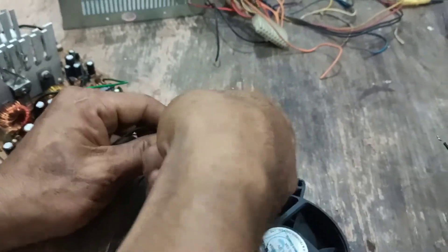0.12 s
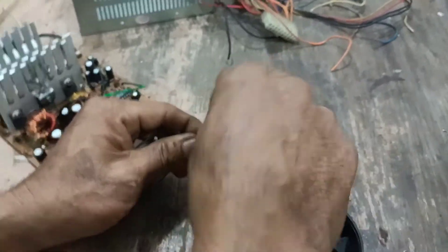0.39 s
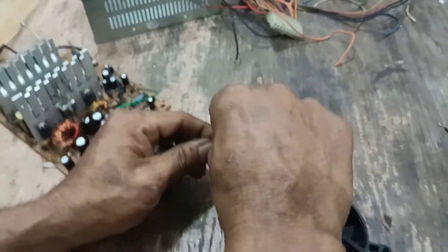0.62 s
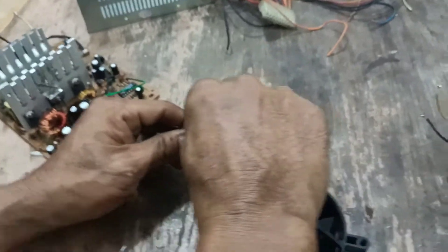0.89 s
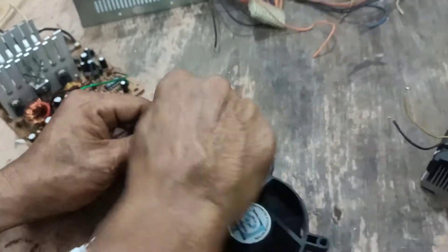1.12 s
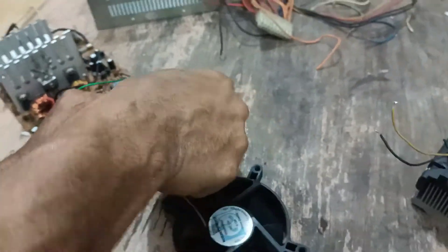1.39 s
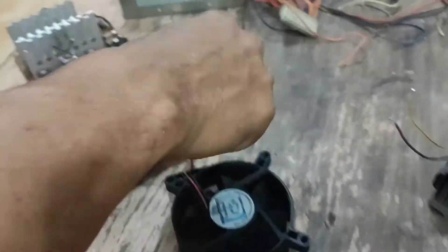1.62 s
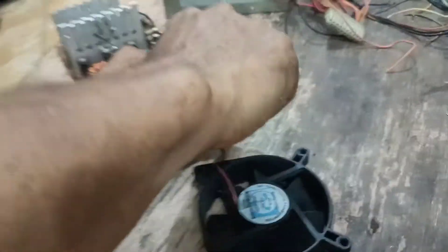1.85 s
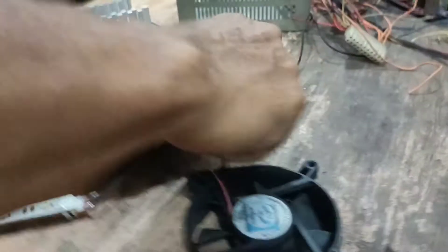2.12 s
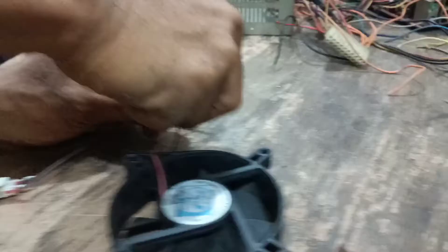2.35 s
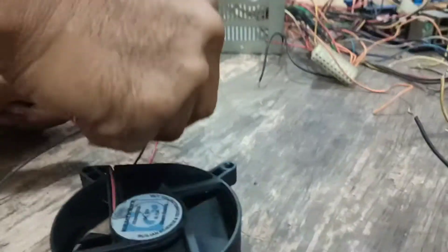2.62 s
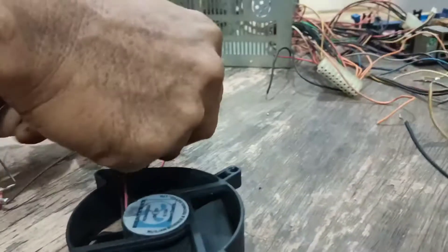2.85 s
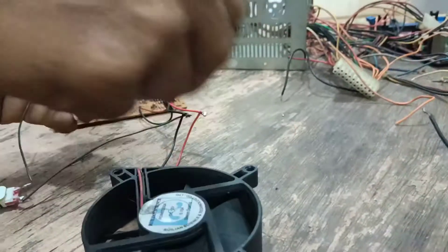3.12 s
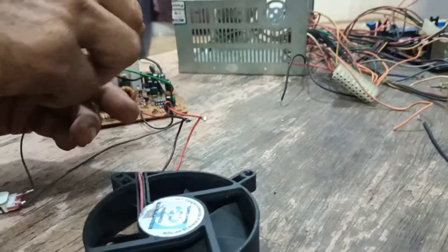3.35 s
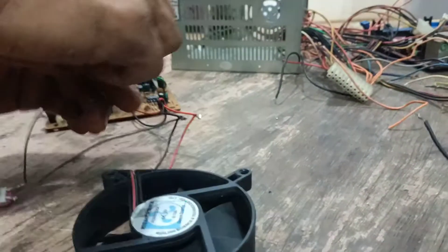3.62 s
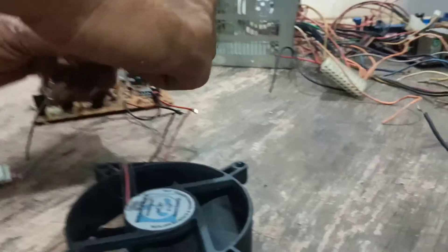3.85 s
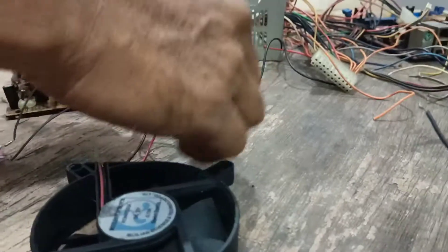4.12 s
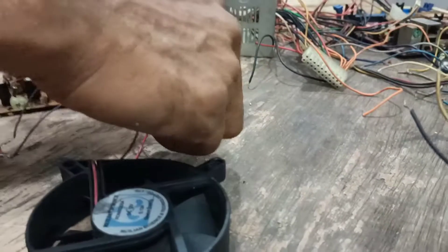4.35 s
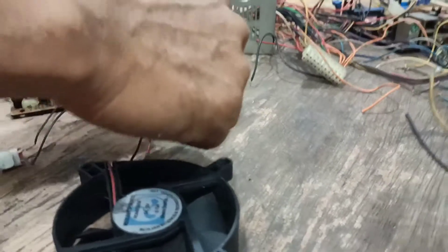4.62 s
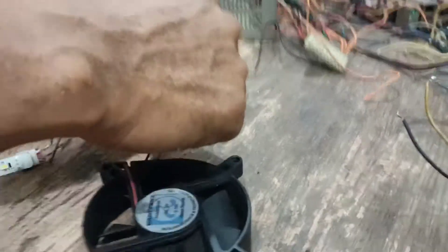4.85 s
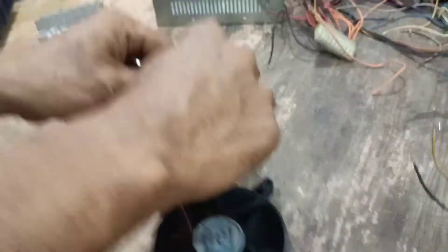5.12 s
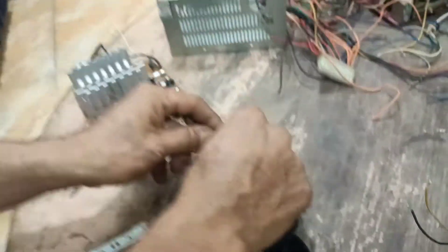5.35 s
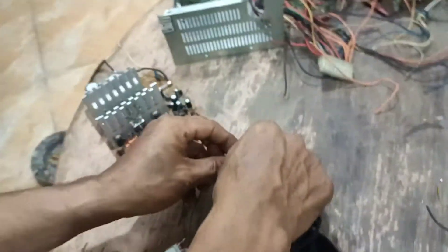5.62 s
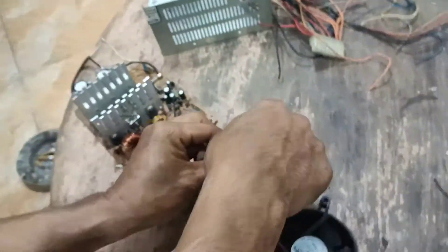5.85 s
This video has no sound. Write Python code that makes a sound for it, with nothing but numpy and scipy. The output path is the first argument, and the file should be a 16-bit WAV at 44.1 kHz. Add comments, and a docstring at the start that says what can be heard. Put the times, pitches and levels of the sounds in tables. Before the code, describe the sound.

A faint, steady hum of a small motor, low tones around 300 Hz with a thin whine near 2.4 kHz on the right, wavers throughout over quiet room air, its balance shifting as the phone moves. From 0 to 1.4 s there are only soft skin and wire rustles, a tiny ping at 0.35 and three light ticks near 1.1. Small dry clicks and brief rustles gather at 2.3-2.7. At 2.9 a loud double knock hits the right side with a low bump. The whine is stronger from 3 to 4.7 s. Left-side clicks come at 4.0, and a sharp snap cluster on both sides at 4.6. At 5.0 a very loud thump leads into a rough finger drag on the right that fades into patches until 5.4, amid heavy knocks at 5.23-5.28. Another knock lands at 5.48, then lighter taps continue to the end. Close, dry, hand-held phone sound.

```python
"""Wires being twisted together rustle, tick and ping over the steady hum of a small motor nearby.
Place: a workbench, heard close up from a hand-held phone with two microphone ports.
The motor is a set of wavering tones, some following the phone's swing through standing waves; skin and
wire are grainy noise and damped pulses; the holding finger bumps (decaying swings) and rubs the right port.
Each port has its own treble resonance."""
import sys
import numpy as np
from scipy import signal
from scipy.fft import rfft, irfft
from scipy.io import wavfile
from scipy.ndimage import uniform_filter1d

SR = 44100
rng = np.random.default_rng(int(sys.argv[2]) if len(sys.argv) > 2 else 0)


def to_wav(s):
    """Save 16-bit WAV."""
    ch = np.atleast_2d(s).T  # columns
    pcm = np.round(np.clip(ch, -1, 1) * 32767)  # PCM
    wavfile.write(sys.argv[1], SR, pcm.astype(np.int16))


def invert_db(level):
    """Linear amplitude ratio for a level in decibels (20 dB per decade), elementwise."""
    return 10 ** (np.asarray(level, dtype=float) / 20)


N = 263718
T = np.arange(N) / SR

# All levels are at the ports, ahead of the port colour and the preamp.
# room air noise: (frequency [Hz], left level [dB per Hz], right level [dB per Hz])
AIR_SPECTRUM = [(25, -90, -103), (49.7, -83.5, -78.5), (100, -89, -94), (186, -81.5, -83), (278, -90, -90),
                (416, -87, -93), (620, -94, -93.5), (800, -102, -100), (1300, -102, -99), (2000, -107, -99),
                (2754, -112, -103), (2830, -116, -113)]
AIR_TREBLE_DB = -114  # per Hz, from 3600 Hz up
# power the ports' air noise has in common, kept within 0.01-0.99: (frequency [Hz], share [0-1])
AIR_LIKENESS = [(60, 0.46), (130, 0.83), (290, 0.78), (640, 0.51), (1410, 0), (3100, -0.08), (6820, 0),
                (15000, 0.53)]

SHAFT_HZ, COIL_HZ = 48.08, 300.7
# tones whose loudness follows the phone through the room's standing waves [Hz]
STANDING_HZ = (COIL_HZ, 9 * SHAFT_HZ, 11 * SHAFT_HZ, 13 * SHAFT_HZ, 5 * COIL_HZ, 1546.6)
# the same tones at both ends of the swing:
# (left at 0 [dB], right at 0 [dB], left at 1 [dB], right at 1 [dB])
STANDING_ENDS = [(-63, -67.5, -72, -71), (-82, -65, -58.5, -63.5), (-58.5, -64.5, -60, -95),
                 (-92, -96, -65, -72.5), (-80, -78, -83, -80), (-88, -78.5, -76, -71)]
# how far the phone has swung along the bench: (time [s], share [0-1])
PHONE_PLACE = [(0, 0.04), (.9, 0), (1.2, .15), (1.6, 0.44), (2.1, 0.39), (2.8, 0.94), (3.5, 0.86),
               (4.0, .9), (4.5, 0.98), (5.0, 0.8), (5.6, 0.5), (5.98, 0.46)]
# motor tones that ignore the phone's place: (frequency [Hz], left level [dB], right level [dB])
STEADY_TONES = [(96.5, -73, -73), (119, -70, -70), (144.5, -74, -72), (172.3, -71, -70), (902, -74, -72),
                (1202.3, -84, -83), (1804, -87, -81), (2115.6, -87, -74), (6634, -105, -96)]
TONE_WAVER_DB = 1.5
# whine at 49 shaft turns on the right port: (time [s], level [dB])
WHINE_LEVEL = [(0, -72.5), (.7, -70), (1.2, -67.5), (1.7, -62.5), (2.0, -74), (2.35, -65), (2.8, -67.5),
               (3.2, -58.5), (3.6, -63.5), (4.0, -59.5), (4.5, -60), (4.9, -66), (5.1, -85), (5.98, -72)]
WHINE_LEFT_DB = -20  # relative to the right port
# side tones on the whine: shaft multiples, and dB relative to the whine
SIDE_TURNS, SIDE_DB = (47, 48, 50, 51), (-26, -10.5, -7.5, -15.5)
SIDE_WAVER_DB = 3
# smeared whine near 94 shaft turns: (left, right) level, and flutter depth
SMEAR_DB, FLUTTER_DB = (-104, -84.5), 3.5

# skin and wire rustling on the bench:
# (start [s], length [s], body level [dB], hiss level [dB], left minus right [dB])
RUSTLES = [(0.086, 0.28, -74, -63, -3), (.45, .091, -71, -75, 2), (1.03, 0.16, -74, -64, -0.5),
           (1.074, .062, -72, -79, -1), (1.17, 0.17, -66.5, -64.5, 1), (1.432, 0.26, -75, -68.5, -.5),
           (2.461, 0.037, -62, -51.5, 16), (2.466, 0.028, -53.5, -80, -12), (2.534, .022, -56, -51.5, 20),
           (2.596, 0.037, -59, -65.5, 3), (2.642, 0.036, -65, -59.5, 1), (2.691, 0.0077, -57, -58.5, 15),
           (3.992, 0.033, -58, -68, 10), (4.378, .05, -63, -75, 4), (5.743, 0.021, -61, -56.5, 17)]
RUB_HZ, RUB_WIDTH_HZ, RUB_GRAIN_DB = 1600, 1140, 3.5  # width of each of two filter passes
RUB_EDGE = 0.29  # share of the length

# pings of wire ends: (time [s], frequency [Hz], length [s], left peak [dB], right peak [dB])
WIRE_PINGS = [(0.355, 2310, 0.0054, -59, -42.5), (1.902, 4800, 0.0043, -62, -58),
              (4.373, 2680, .012, -67, -64), (5.216, 1430, 0.0049, -65, -22)]

# ticks and snaps, peaks at the nearer port:
# (time [s], body frequency [Hz], body peak [dB], crack peak [dB], left minus right [dB])
SNAPS = [(1.081, 910, -42, -48, 1), (1.098, 1100, -41, -65, -12), (1.1153, 1070, -40, -42, -2.5),
         (2.3112, 1700, -59, -55, -16), (2.482, 1850, -38, -36, -4), (2.5661, 1470, -42, -70, -30),
         (2.6555, 1440, -57, -44, -3), (2.693, 1600, -40, -53, 15), (2.8956, 1230, -10, -13.5, -25),
         (2.9003, 1800, -22, -24, -16), (2.9054, 1600, -7, -16, -14), (3.0924, 2030, -56, -45.5, -20),
         (3.986, 1480, -22, -43, 40), (3.9996, 1140, -29, -57, 32), (4.0103, 1290, -24.5, -33, 40),
         (4.3795, 1200, -36, -60, -5), (4.4676, 1600, -38, -35, -3), (4.4965, 2000, -62, -48, -8),
         (4.5353, 1300, -35, -54, -35), (4.5742, 1510, -40, -57, -30), (4.5905, 1170, -14, -48, -17),
         (4.589, 1120, -18, -8.5, 30), (4.5917, 1410, -15, -17.5, 12), (4.6075, 1380, -16.5, -48, -14),
         (4.823, 1110, -37.5, -70, -35), (4.9929, 800, -29, -28, -30), (4.9961, 1000, -7, -19, -38),
         (5.001, 1030, -5.5, -18, -22), (5.219, 1430, -16, -25, -45), (5.2323, 1060, -8.5, -28.5, -47),
         (5.2728, 910, -17.5, -44, -37), (5.2806, 1140, -3.5, -29.5, -42), (5.3643, 1050, -25, -51, -40),
         (5.4844, 1060, -11.5, -29.5, -40), (5.5706, 920, -34, -49, -30), (5.6367, 1160, -40.5, -53, 15),
         (5.662, 960, -34, -70, -35), (5.7494, 810, -32, -48, 2.5), (5.8555, 1020, -34.5, -51, -10),
         (5.872, 1450, -32, -54, -30), (5.9264, 1600, -30.5, -59, -28)]
FAR_CRACK_DB = -18  # extra loss of the crack on its way round the phone
TICK_RING_S = .007  # the rough tail falls by 60 dB
TICK_ROUGH, DIP_ROUGH = 0.23, 0.14  # tail relative to the pulse, in crack and in body

# finger bumps on the right port, peaks ahead of the pressure leak:
# (time [s], peak level [dB], ring frequency [Hz], press -1 or release +1)
FINGER_BUMPS = [(2.5364, -34, 235, -1), (2.5949, -33, 346, -1), (2.6546, -35.5, 159, 1),
                (2.6666, -26, 168, -1), (2.8979, -8, 217, -1), (2.9056, -4, 142, -1),
                (3.029, -35.5, 132, -1), (3.12, -37, 100, 1), (3.2303, -38.5, 123, -1),
                (3.9861, -28.5, 363, -1), (4.456, -35, 69.5, 1), (4.5347, -29, 140, 1), (4.591, -18, 93, 1),
                (4.6074, -11.5, 311, -1), (4.6107, -13.5, 86, -1), (4.8215, -30, 134, -1),
                (4.9943, -1.5, 256, 1), (4.9973, -2, 184, -1), (5.0018, -8.5, 264, -1),
                (5.2336, -12, 203, -1), (5.273, -9.5, 172, 1), (5.2815, -14, 318, 1),
                (5.2847, -21.5, 78, 1), (5.308, -26.5, 93, 1), (5.351, -21, 205, 1), (5.363, -22, 94, -1),
                (5.4839, -10, 194, 1), (5.5726, -20.5, 100, -1), (5.6635, -21, 100, -1),
                (5.7507, -22.5, 450, -1), (5.8561, -19.5, 100, -1), (5.8666, -26.5, 143, -1),
                (5.9232, -17, 91, -1)]
BUMP_LEFT_DB = -38  # relative to the right port
RING_SWINGS = 4.4  # swings in which the decay falls by 60 dB
LEAK_HZ = 35  # the port leaks slower pressure changes
# faint chance bumps while the grip fidgets: (from, to) in seconds; lowest peak; pitch before its spread
FIDGET_S, FIDGET_COUNT, FIDGET_DB, FIDGET_HZ = (2.93, 3.45), 7, -44.5, 112

# body noise of the dragging finger: (frequency [Hz], level [dB])
DRAG_SPECTRUM = [(60, -1), (200, 0.5), (500, 0), (800, -1), (1200, -2.5), (1800, -4.5), (2600, -15.5),
                 (3400, -29), (5000, -44)]
# long drag of the finger over the right port, silent outside these times: (time [s], level [dB])
DRAG_STROKE = [(5.002, -73), (5.007, -25), (5.045, -22), (5.06, -27), (5.14, -34), (5.152, -50.5),
               (5.177, -50), (5.183, -41), (5.222, -35.5), (5.229, -67), (5.294, -68), (5.3, -38),
               (5.34, -39), (5.347, -51), (5.353, -38), (5.402, -39), (5.412, -63)]
DRAG_HISS_DB = -16.5  # relative to the body
# short scuffs of the finger next to its knocks:
# (start [s], length [s], starting level [dB], hiss relative to body [dB])
FINGER_SCUFFS = [(2.887, .007, -43, -18), (2.908, 0.013, -37, -11.5), (4.605, .017, -37, -2),
                 (5.233, 0.014, -28, -16), (5.275, 0.012, -29, -16.5), (5.282, 0.016, -24.5, -16.5),
                 (5.482, .013, -25, -20.5), (5.853, 0.028, -42.5, -15), (5.921, 0.014, -41, -14.5)]
SCUFF_ATTACK_S, SCUFF_FALL_S, SCUFF_FADE_DB = .002, .005, -6
SCRAPE_LEFT_DB = -40  # dull left-port sound relative to the right body

# treble colour of each microphone port: (frequency [Hz], left gain [dB], right gain [dB])
PORT_COLOUR = [(2400, -1, 0.5), (3530, -2, -0.5), (4180, -5, -1.5), (4750, -5, 2), (5040, -7, 1),
               (5950, -21, 1.5), (6710, -20, 9.5), (7510, -18, 1), (8570, -8.5, -11.5), (9930, 3, -20.5),
               (11100, -5, -27), (12640, -4.5, -7.5), (14600, -23, -8.5), (16000, 8, -3)]
TOP_HZ = 15700


def colour(x, hz, db):
    """Shape the spectrum along straight lines over log frequency."""
    f = np.fft.rfftfreq(x.shape[-1], 1 / SR) + 1
    gain = invert_db(np.interp(np.log(f), np.log(hz), db))
    return irfft(rfft(x) * gain, x.shape[-1])


def band(x, hz, width):
    """Causal band-pass resonance, applied twice for steep flanks."""
    b, a = signal.iirpeak(min(hz, SR / 2.5), max(hz / width, .3), fs=SR)
    return signal.lfilter(b, a, signal.lfilter(b, a, x))


def walk(rate, count):
    """Slow random wander, spread near 1: held random steps at `rate` per second, smoothed twice."""
    k = int(SR / rate)
    steps = np.repeat(rng.standard_normal((count, N // k + 1)), k, axis=1)[:, :N]
    return 0.92 * uniform_filter1d(uniform_filter1d(steps, k), k)


def curve(points, outside=None):
    """A control curve at every sample, straight between its points."""
    return np.interp(T, *np.transpose(points), outside, outside)


def stroke(start, length, rise, fall, fade_db):
    """On-off envelope with soft edges and a steady fade."""
    t = T - start
    edges = np.minimum(t / rise, (length - t) / fall) / 2 + .5
    return np.clip(edges, 0, 1) * invert_db(fade_db * np.clip(t / length, 0, 1))


def panned(pan_db):
    """Left and right gains that differ by pan_db and average 1."""
    sides = invert_db(np.array([[pan_db], [-pan_db]]) / 2)
    return sides * 2 / sides.sum()


def air():
    """Room noise, alike on both ports in the bass and unrelated through most of the treble."""
    hz, left_db, right_db = np.transpose(AIR_SPECTRUM)
    like_hz, like = np.transpose(AIR_LIKENESS)
    like = np.clip(like, .01, .99)
    # white noise at 0 dB per Hz
    shared, *own = rng.standard_normal((3, N)) * np.sqrt(SR / 2)
    shared = colour(shared, like_hz, 10 * np.log10(like))
    mix = [shared + colour(x, like_hz, 10 * np.log10(1 - like)) for x in own]
    out = [colour(x, [*hz, 3600], [*db, AIR_TREBLE_DB]) for x, db in zip(mix, (left_db, right_db))]
    sway_db = walk(3.78, count=1)
    return np.array(out) * invert_db(sway_db)


def motor():
    """Shaft and coil tones; each wavers, and the strongest follow the phone's place in the room."""
    drift = 1 + 0.0004 * walk(1.52, count=1)[0]
    turns = 2 * np.pi * np.cumsum(drift) / SR

    def tone(hz):
        """Sine at 0 dB rms with the shared pitch drift and its own waver on each port."""
        sine = np.sqrt(2) * np.sin(hz * turns + 2 * np.pi * rng.random())
        return sine * invert_db(TONE_WAVER_DB * walk(7.2, count=2))

    place = np.clip(curve(PHONE_PLACE), 0, 1)
    ends = invert_db(STANDING_ENDS).reshape(-1, 2, 2, 1)
    out = sum((a + place * (b - a)) * tone(hz) for (a, b), hz in zip(ends, STANDING_HZ))

    whine = tone(49 * SHAFT_HZ)
    for multiple, db in zip(SIDE_TURNS, SIDE_DB):
        whine += invert_db(db + SIDE_WAVER_DB * walk(9, count=1)) * tone(multiple * SHAFT_HZ)
    out += invert_db([[WHINE_LEFT_DB], [0]] + curve(WHINE_LEVEL)) * whine

    smear = band(rng.standard_normal(N), 94 * SHAFT_HZ, 60)
    smear_db = np.array(SMEAR_DB)[:, None] + FLUTTER_DB * walk(21, count=1)
    out += invert_db(smear_db) * smear / smear.std()

    for hz, left_db, right_db in STEADY_TONES:
        out += invert_db([[left_db], [right_db]]) * tone(hz)
    return out


def grainy_hiss():
    """Stick-slip roughness on each port, and bright noise at 0 dB rms that carries it."""
    grain = invert_db(RUB_GRAIN_DB * walk(300, count=2))
    noise = rng.standard_normal((2, N)) * grain
    hiss = colour(noise, [1500, 4000, 5500, 10000, 16000], [-9.5, -3.5, -2, -1, -1])
    return grain, hiss / hiss.std()


def rustles():
    """Stick-slip noise of skin and wire on the bench: a broad body band and a hiss, both grainy."""
    grain, hiss = grainy_hiss()
    body = band(rng.standard_normal((2, N)) * grain, RUB_HZ, RUB_WIDTH_HZ)
    body /= body.std()
    out = np.zeros((2, N))
    for start, length, body_db, hiss_db, pan_db in RUSTLES:
        edge = RUB_EDGE * length
        swell = stroke(start, length, edge, edge, 0)
        out += panned(pan_db) * swell * (invert_db(body_db) * body + invert_db(hiss_db) * hiss)
    return out


def pings():
    """Wire ends ring for a few cycles of one pitch, swelling and gone."""
    out = np.zeros((2, N))
    for s, hz, length, *db in WIRE_PINGS:
        swell = np.sin(np.pi * np.clip((T - s) / length, 0, 1)) ** 2
        out += invert_db(db)[:, None] * swell * np.sin(2 * np.pi * hz * (T - s))
    return out


def ticks():
    """A single pressure dip that barely rings, with a rougher, brighter crack on top."""
    count = 2048  # samples given to each tick
    out, t = np.zeros((2, N + count)), T[:count]
    blow = -1. * (t == 0)
    for s, hz, body_db, crack_db, pan_db in SNAPS:
        far_body_db = body_db - abs(pan_db)
        far_crack_db = crack_db - abs(pan_db) + FAR_CRACK_DB
        near_far = np.array([[body_db, far_body_db], [crack_db, far_crack_db]])
        # a positive pan puts the left port nearer
        left_right = near_far if pan_db > 0 else near_far[:, ::-1]
        tail = rng.standard_normal((2, count)) * np.exp(-np.log(1000) * t / TICK_RING_S)
        dull = signal.butter(3, [0.14 * hz, 1.334 * hz], "band", fs=SR, output="sos")
        body = signal.sosfilt(dull, blow + DIP_ROUGH * tail)
        crack = band(blow + TICK_ROUGH * tail, 5760, 13900)
        at = int(s * SR)
        for part, gain in zip((body, crack), invert_db(left_right).reshape(2, 2, 1)):
            out[:, at:at + count] += gain * part / abs(part).max(axis=1, keepdims=True)
    return out[:, :N]


def bumps():
    """The finger squeezes the air in the port: a soft push that swings back once or twice."""
    count = 8192  # samples given to each bump
    out, t = np.zeros(N + count), T[:count]
    fidgets = [(np.interp(u, (0, 1), FIDGET_S), FIDGET_DB + 4 * v, FIDGET_HZ * (.85 + 0.25 * w), -1)
               for u, v, w in rng.random((FIDGET_COUNT, 3))]
    for s, db, hz, way in FINGER_BUMPS + fidgets:
        decay = invert_db(-60 * t * hz / RING_SWINGS)
        soft_start = (1 - np.exp(-t * hz * 13.7)) ** 2
        swing = np.sign(way) * np.sin(2 * np.pi * hz * t) * decay * soft_start
        at = int(s * SR)
        out[at:at + count] += invert_db(db) * swing / abs(swing).max()
    leak = signal.butter(2, LEAK_HZ, "high", fs=SR, output="sos")
    return invert_db([[BUMP_LEFT_DB], [0]]) * signal.sosfilt(leak, out[:N])


def finger_scrapes():
    """Stick-slip noise of the finger scuffing and dragging over the right port; dull on the left."""
    grain, hiss = grainy_hiss()
    body = colour(rng.standard_normal(N) * grain[1], *np.transpose(DRAG_SPECTRUM))
    # the skin grips unevenly, so the noise comes in patches
    body *= invert_db(2.5 * walk(60, count=1)[0])
    far = band(body, 1000, 900)
    far /= far.std()
    body /= body.std()
    touches = [(invert_db(curve(DRAG_STROKE, -np.inf)), DRAG_HISS_DB)]
    for start, length, db, hiss_db in FINGER_SCUFFS:
        scuff = stroke(start, length, SCUFF_ATTACK_S, SCUFF_FALL_S, SCUFF_FADE_DB)
        touches.append((invert_db(db) * scuff, hiss_db))
    out = np.zeros((2, N))
    for level, hiss_db in touches:
        out += level * np.array([invert_db(SCRAPE_LEFT_DB) * far, body + invert_db(hiss_db) * hiss[1]])
    return out


def narrow_hiss():
    """A faint airy squeak, a narrow band of noise, swells and fades at the right port."""
    start, length, level_db = 4.72, .12, -76  # s, s, dB
    squeak = band(rng.standard_normal(N), 3750, 250)
    swell = stroke(start, length, length / 2, length / 2, 0)
    return np.array([[0], [invert_db(level_db)]]) * swell * squeak / squeak.std()


def scene():
    """Everything at the two ports."""
    return air() + motor() + rustles() + pings() + ticks() + bumps() + finger_scrapes() + narrow_hiss()


def top_cut(x):
    """Nothing passes above the cut-off."""
    return signal.sosfilt(signal.butter(12, 16460, fs=SR, output="sos"), x)


def record(dry):
    """Each port colours the treble in its own way, with the delay of a real resonance."""
    taps = 1024
    hz, *port_db = np.transpose(PORT_COLOUR)
    f = np.fft.rfftfreq(taps, 1 / SR) + 1
    ports = []
    for x, db in zip(dry, port_db):
        gain = invert_db(np.interp(np.log(f), np.log(hz), db))
        cepstrum = irfft(np.log(gain))
        # folding the cepstrum onto positive delays makes the response causal
        cepstrum[1:taps // 2] *= 2
        cepstrum[taps // 2 + 1:] = 0
        response = irfft(np.exp(rfft(cepstrum)))
        ports.append(signal.fftconvolve(x, response)[:N])
    low_pass = signal.cheby2(10, 30, TOP_HZ, fs=SR, output="sos")
    mix = signal.sosfilt(low_pass, ports)
    # the preamp rounds the very loudest peaks
    mix = np.tanh(.8 * mix) / .8
    return top_cut(mix)


dry = scene()
out = record(dry)
to_wav(out)
```